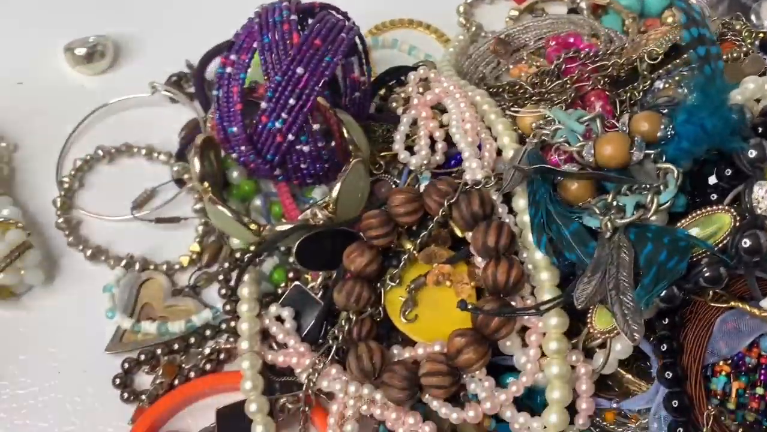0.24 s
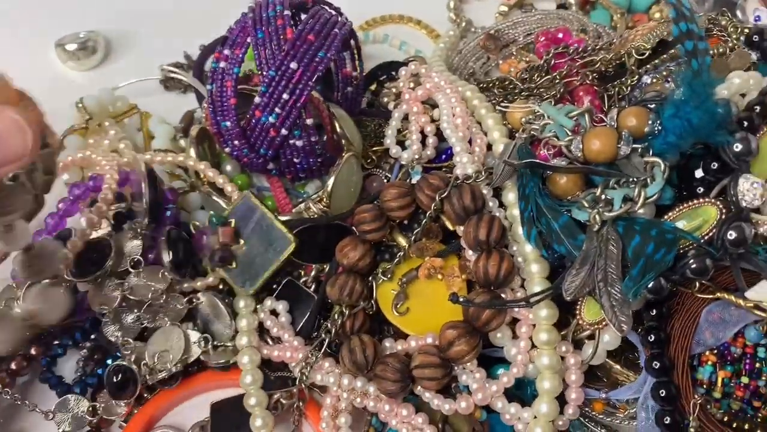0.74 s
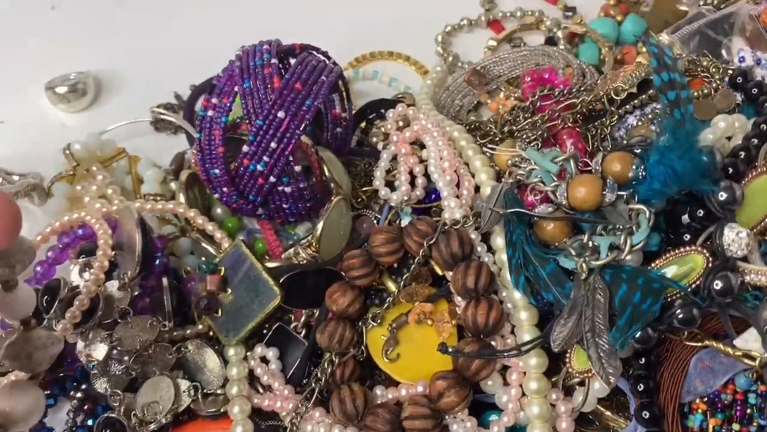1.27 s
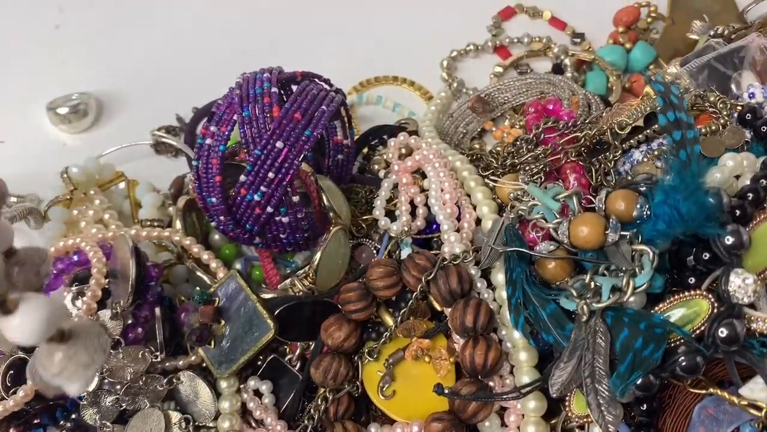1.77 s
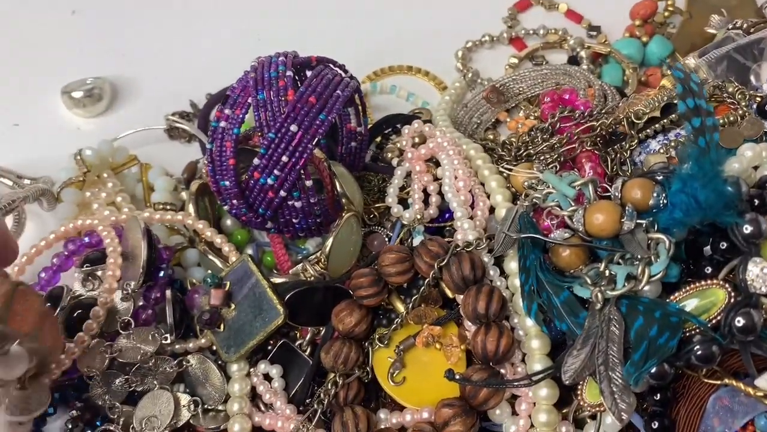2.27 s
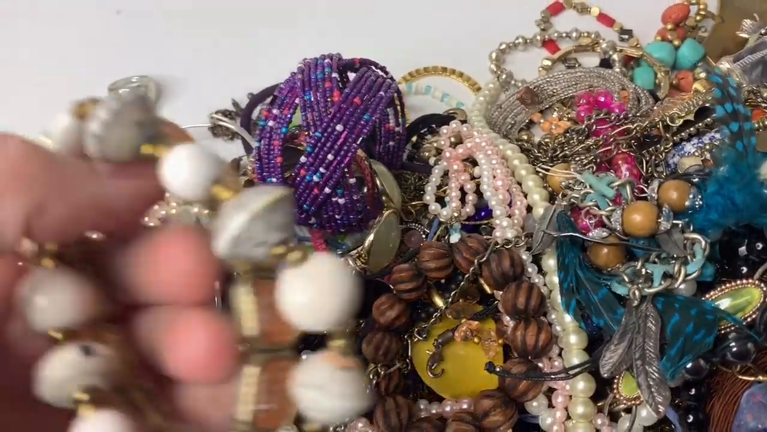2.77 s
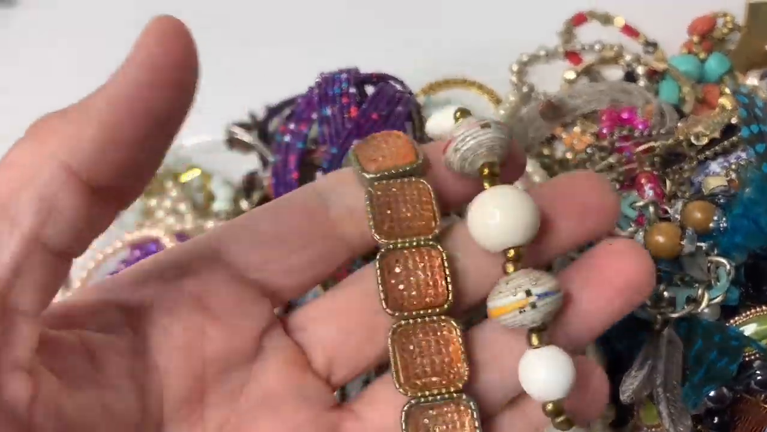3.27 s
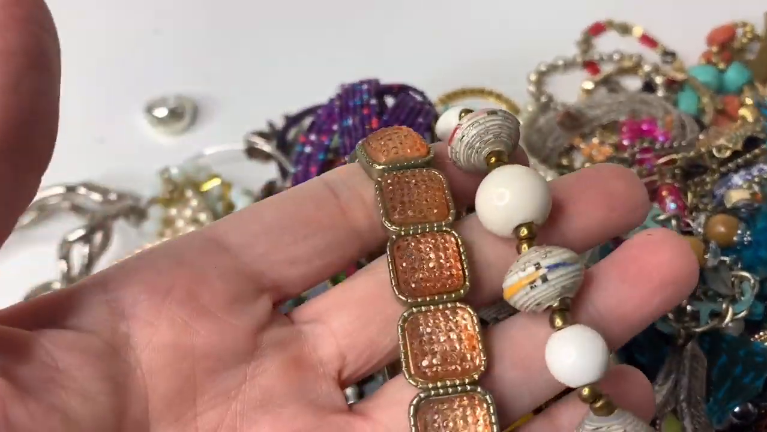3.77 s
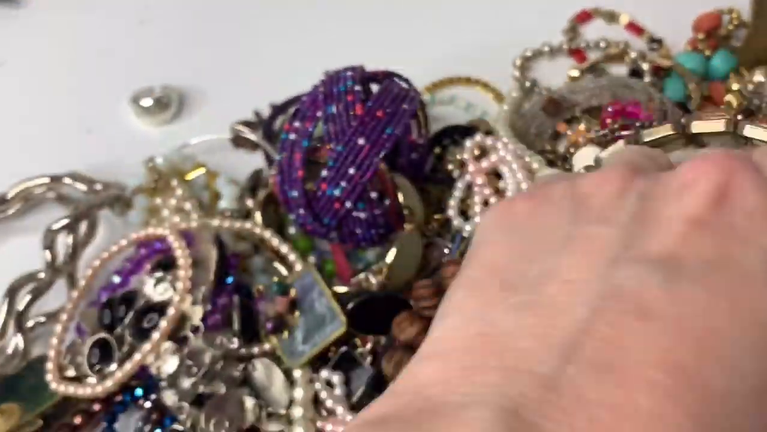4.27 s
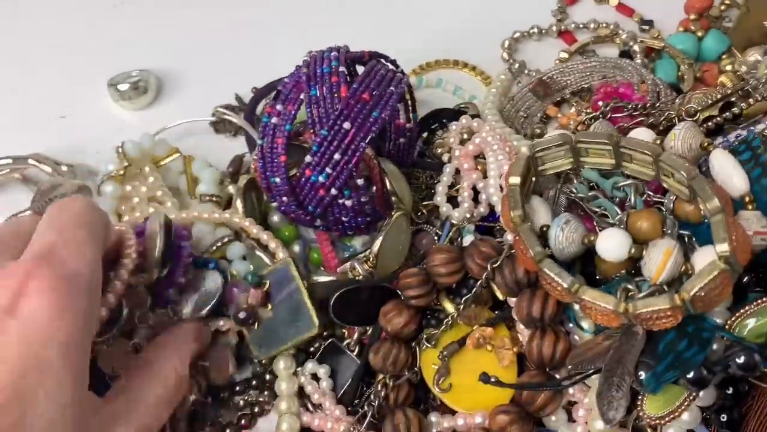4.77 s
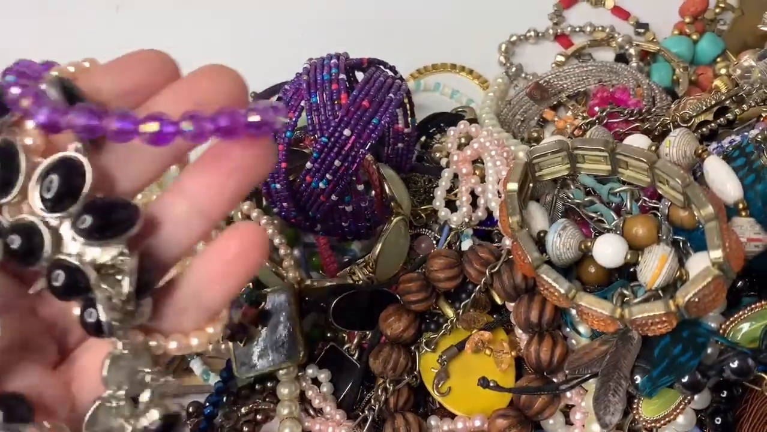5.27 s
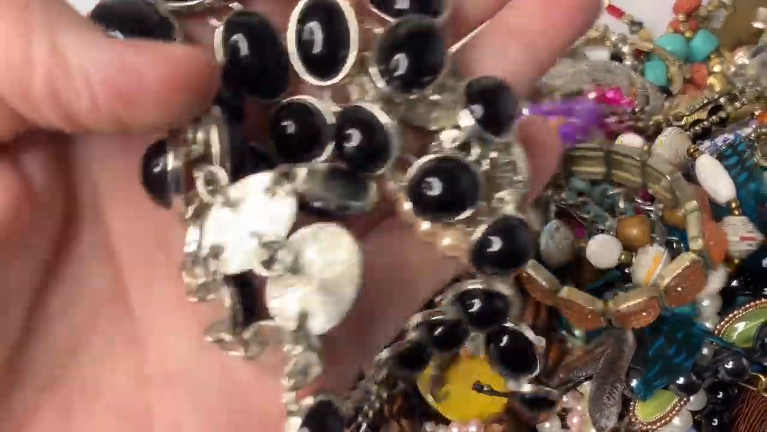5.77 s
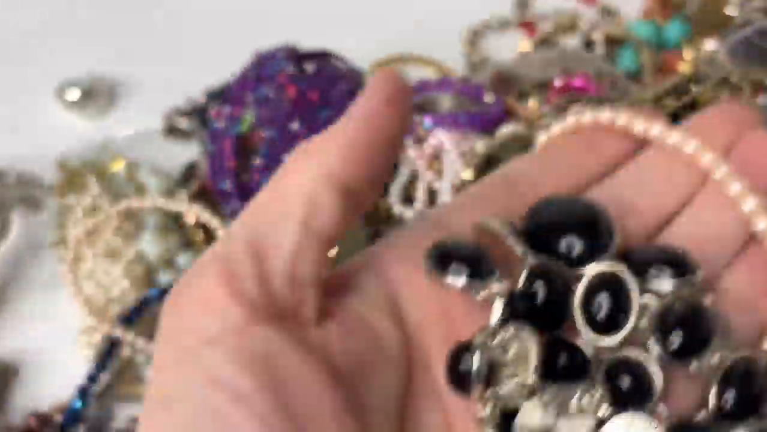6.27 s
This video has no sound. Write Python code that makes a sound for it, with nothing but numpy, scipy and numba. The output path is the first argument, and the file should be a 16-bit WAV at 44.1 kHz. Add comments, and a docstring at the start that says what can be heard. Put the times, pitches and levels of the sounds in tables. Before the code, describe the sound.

In a small room a fan runs throughout, a soft low airy hum. From about 0.1 s a bundle of jewellery drags over a table: dull knocks, low rumble and dense bead clatter, ending in a sharp bright crash of chains near 0.55-0.6 s. Loose ticks dwindle through 1 s, with only isolated tiny clicks until 2.1 s. Light bead clicks and faint rustles follow to 2.8 s, with one clear clack at 3.0 s. Almost only the fan remains until 4.15 s, when a bracelet is laid down with brief clinks. At 4.7-5.15 s a necklace is grabbed and pulled free: busy fizzing rattle, bead clacks, table knocks, high disc jingles. Smaller ticks and a dull landing at 5.57 s continue to 5.95 s. A crisp, very bright metallic clash strikes around 6.2 s, the fan briefly dips, and fine chain rattle rises again at 6.5 s. Close, dry stereo phone pickup.

```python
"""Rummaging through costume jewellery

Hands stir a heap of costume jewellery on a table, close to a phone in a small room with a humming fan.
A bundle is dragged over the table top, then bracelets and necklaces are picked up, turned over and dropped.
Contacts ring beads and links as short damped sines; metal discs ring longer and the table knocks underneath.
The heap and the walls scatter these sounds; filtered noise and wavering sine lines make the fan."""
import sys
import numpy as np
from scipy import signal
from scipy.fft import rfft, irfft, next_fast_len
from scipy.io import wavfile
from scipy.ndimage import uniform_filter1d
from numba import njit

SR = 44100
rng = np.random.default_rng(int(sys.argv[2]) if len(sys.argv) > 2 else 0)


def pcm_store(signal):
    """Save signal as 16-bit PCM."""
    levels = np.round(np.clip(np.atleast_2d(signal), -1, 1) * 32767)
    wavfile.write(sys.argv[1], SR, levels.astype(np.int16).T)


N = 288272  # length in samples
TOP_HZ = 16200  # upper edge of the phone's band

# How the two microphone ports hear a piece: low bands reach the left port first, treble the right one.
# Each row: frequency in Hz, typical lag of the left port in seconds.
PORT_LAG = [(5500, -.00028), (6800, .000183)]


def undb(db):
    """Decibels to gain."""
    return 10 ** (np.asarray(db) / 20)


def unit(x):
    """Scale to rms 1."""
    return x / np.sqrt(np.mean(x ** 2))


def on_log(hz, points):
    """Read (Hz, value) points on a log-frequency axis."""
    point_hz, value = np.transpose(points)
    return np.interp(np.log(hz + 1), np.log(point_hz), value)


def colour(x, points):
    """Filter by a (Hz, dB) spectrum."""
    length = x.shape[-1]
    n = next_fast_len(length + 1000, real=True)
    hz = np.arange(n // 2 + 1) * SR / n
    return irfft(rfft(x, n) * undb(on_log(hz, points)), n)[..., :length]


def walk(rate):
    """Slow chance: random levels, rate of them a second, joined by straight lines."""
    return np.interp(np.arange(N) / SR * rate, np.arange(512), rng.standard_normal(512))


@njit
def ring(s, lag, hz, t60, size, rise_s):
    """Damped sines that swell over rise_s, a row for each contact; the left port hears them lag seconds later."""
    out = np.zeros((2, N))
    for k in range(len(s)):
        for m in range(hz.shape[1]):
            pole = (2j * np.pi * hz[k, m] - np.log(1000) / t60[k, m]) / SR
            step = np.exp(pole)
            for side in range(2):
                start = (s[k] + lag[k, m] * (1 - side)) * SR
                first = int(start) + 1
                last = min(N, first + int((t60[k, m] + rise_s) * SR))
                # the start falls between samples
                z = size[k, m] * np.exp(pole * (first - start))
                for i in range(max(first, 0), last):
                    swell = min((i - start) / (rise_s * SR), 1.)
                    out[side, i] += z.imag * swell * swell * (3 - 2 * swell)
                    z *= step
    return out


def contacts(s, db, top_hz, ring_s, ring_spread, lag_spread, centre_hz=None, octaves=0.91, count=8):
    """Each contact rings its own small piece: chance partials up to about top_hz, with ring times around ring_s."""
    place, turn = rng.random((len(s), 2, count)).transpose(1, 0, 2)
    strength, decay, where = rng.standard_normal((len(s), 3, count)).transpose(1, 0, 2)
    hz = top_hz * (np.arange(count) + .5 + place) / (count + .5)
    t60 = ring_s * np.exp(ring_spread * decay)
    size = undb(1.3 * strength) * (ring_s / t60) ** .5
    if centre_hz is not None:
        size = size * np.exp(-.5 * (np.log2(hz / centre_hz[:, None]) / octaves) ** 2)
    size = size * (undb(db) / np.linalg.norm(size, axis=1))[:, None]
    size = size * np.exp(2j * np.pi * turn)
    # pieces lie in different directions, so their lags between the ports differ
    lag = on_log(hz, PORT_LAG) * (1 + lag_spread * where[:, :1])
    return ring(s, lag, hz, t60, size, rise_s=0.00013)


def shower(gain, rate, spread_db, top_hz, ring_s, lag_spread, points, count=7000):
    """A random run of contacts, many faint and a few strong; harder movement makes them denser and louder."""
    # full rate (per s) from this level up; gentler moves thin the contacts out by the power
    busy_db, crowding = -29, .6
    chance = rng.random((count, 2))
    busy = np.minimum(gain / undb(busy_db), 1) ** crowding
    # exponential gaps on a clock that runs with the busyness
    at = np.searchsorted(np.cumsum(busy) * rate / SR, np.cumsum(-np.log(1 - chance[:, 0])))
    at = at[at < N]
    excess_db = spread_db * np.minimum(-np.log(1 - chance[:len(at), 1]), 3.5)
    db = excess_db + 10 * np.log10(gain[at] ** 2 / busy[at])
    # the wide spread lets a few pieces ring much longer than the rest
    run = colour(contacts(at / SR, db, top_hz, ring_s, 1., lag_spread), points)
    # the whole run takes the rms of the gain
    return unit(run) * np.sqrt(np.mean(gain ** 2))


def strike(s, db, modes, detune, scatter_db, weight=1):
    """Blows on a body with nearly fixed modes; each blow meets it at another spot and excites them differently."""
    hz, mode_db, t60 = np.transpose(modes)
    shift, spot = rng.standard_normal((len(s), 2, len(hz))).transpose(1, 0, 2)
    size = np.sign(spot) * undb(mode_db + scatter_db * np.abs(spot)) * weight
    size = size * (undb(db) / np.linalg.norm(size, axis=1))[:, None]
    lag = np.tile(on_log(hz, PORT_LAG), (len(s), 1))
    return ring(s, lag, hz * (1 + detune * shift), np.tile(t60, (len(s), 1)), size + 0j, rise_s=0.002)


def strokes(start, length, db, settle_s):
    """Gain over time of a set of strokes: each rises, holds with a slight sag and then fades as the pieces settle."""
    attack_s, sag_db_per_s = 0.01402, 5.5
    t = np.arange(0, N, 32) / SR
    age = t - start[:, None]
    sag_db = sag_db_per_s * np.clip(age, 0, None)
    settle_db = 60 * np.clip(age - length[:, None], 0, None) / settle_s[:, None]
    gain = np.clip(age / attack_s, 0, 1) * undb(db[:, None] - (sag_db + settle_db))
    return np.interp(np.arange(N) / SR, t, np.linalg.norm(gain, axis=0))


def stirring():
    """How hard the hand stirs the fine chains and the larger beads."""
    # Moves of the hand: a bundle dragged and let fall, fingers feeling among the beads, a bracelet laid
    # down, a necklace grabbed, pulled free, turned over on the palm and lowered on to the heap.
    # Each row: start in seconds, length in seconds, fine chains in relative dB, larger beads in relative dB,
    # time to settle by 60 dB in seconds (a negative time grows instead, as at the very end).
    moves = [(0.103, 0.04, -37, -34, 0.92), (0.18, .13, -32.5, -29.5, 0.42), (0.31, .18, -30, -27.5, 0.56),
             (0.552, .066, -24.5, -30.5, 0.0939), (0.63, .02, -41, -48, 0.72),
             (0.984, 0.0237, -38.5, -50, 0.15), (1.34, .09, -80, -68, 0.07),
             (2.113, 0.0191, -60.5, -60, 0.33), (2.183, 0.04, -51, -42, 0.22),
             (2.253, 0.0289, -52, -47, 0.21), (2.36, .02, -78, -64, .5), (2.529, 0.09, -55, -52, 0.3),
             (2.652, 0.045, -54, -50, 0.27), (2.781, 0.0404, -63.5, -58, 0.9), (2.99, .015, -58, -51, 0.2),
             (4.155, 0.0405, -43, -39, 0.68), (4.239, 0.0497, -42, -45, 0.5),
             (4.39, 0.0917, -70, -60, 0.69), (4.655, 0.0399, -42, -50, 0.07),
             (4.705, 0.06, -29, -30.5, 0.09), (4.802, .1, -33, -38, 0.26), (4.91, 0.085, -32.5, -45, 0.07),
             (5.04, 0.054, -38.5, -42.5, 0.14), (5.135, 0.035, -36, -45, 0.38),
             (5.196, 0.0968, -50, -54.5, 0.3), (5.346, 0.02825, -55, -54, 0.13),
             (5.415, 0.125, -48, -51.5, 0.2), (5.563, 0.04, -39, -39.5, 0.26),
             (5.668, 0.04, -47.5, -54, 0.35), (5.759, .025, -39, -50, 0.5),
             (5.846, 0.0952, -39, -51.5, 0.62), (6.083, 0.0252, -49, -61.5, 0.73),
             (6.174, 0.028, -23.5, -42, 0.09), (6.409, 0.069, -53, -56, 0.7),
             (6.495, 0.04, -30.5, -44.5, -2)]
    start, length, chain_db, bead_db, settle_s = np.transpose(moves)
    return strokes(start, length, chain_db, settle_s), strokes(start, length, bead_db, settle_s)


def rattle(chain_gain, bead_gain):
    """Chain links sizzle and larger beads clatter as the heap is stirred; strands snag and slip in quick spurts."""
    # Spectrum of the fine chains. Each row: frequency in Hz, relative level in dB.
    chain_colour = [(1000, -35), (2500, -28.5), (4000, -11.5), (6000, -11.5), (7500, 2), (9400, -.5),
                    (11500, 1), (13200, -5.5), (14300, 0), (15200, 4), (16500, -27.5)]
    # Spectrum of the larger beads. Each row: frequency in Hz, relative level in dB.
    bead_colour = [(500, -24), (1500, -4), (2100, -3), (2700, -2.5), (3400, -1), (4400, 0.5), (5200, -4),
                   (6500, -4.5), (10000, -15), (16000, -24.5)]
    # How unevenly the strands slip, less in the steady drag and more once they are picked up.
    # Each row: time in seconds, typical swing of the level in dB.
    snag = [(.55, 1), (.7, 2.)]
    chains = shower(chain_gain, rate=1800, spread_db=2.2, top_hz=16750.0, ring_s=.0028,
                    lag_spread=0.016, points=chain_colour)
    beads = shower(bead_gain, rate=1400, spread_db=2.3, top_hz=8882.0, ring_s=0.005,
                   lag_spread=0.5, points=bead_colour)
    swing_db = np.interp(np.arange(N) / SR, *np.transpose(snag))
    spurts = undb(swing_db * walk(70))
    # the larger beads are 3 dB louder at the right port
    beads = beads * undb(np.array([[-1], [1]]) * 3 / 2)
    return spurts * (chains + undb(-4.0) * beads)


def strays(stir, per_s, over_db, hz):
    """Chance contacts that stand out of the rattle and follow the stirring: rows of (s, relative dB, Hz)."""
    spread_db, octaves = 1.5, .9  # scatter either way of level and pitch
    slot, strength, tone = rng.random((int(per_s * N / SR), 3)).T
    s = (np.arange(len(slot)) + slot) / per_s
    stir_db = 20 * np.log10(np.interp(s * SR, np.arange(N), stir) + 1e-9)
    db = stir_db + over_db + spread_db * (2 * strength - 1)
    return np.transpose([s, db, hz * 2 ** (octaves * (2 * tone - 1))])


def clicks(rows):
    """Beads and links click: a graze, a sharp tick, then neighbours rebound and ring on a little."""
    # Spectrum of the clicks. Each row: frequency in Hz, gain in dB.
    click_colour = [(800, -9), (2000, 2), (2800, 1.5), (4500, -0.5), (16000, 0.5)]
    s, db, hz = rows.T.copy()
    brush, first, second = rng.random((len(s), 3)).T
    graze = contacts(s - 0.006 * brush, db - 16.5, TOP_HZ, ring_s=0.0027, ring_spread=0.35,
                     lag_spread=0.065, centre_hz=hz)
    tick = contacts(s, db + 2.5, TOP_HZ, ring_s=.0021, ring_spread=.35,
                    lag_spread=.04, centre_hz=hz, octaves=.55, count=16)
    rebound = contacts(s + 0.000615 + 0.0025 * first, db - 7.0, TOP_HZ, ring_s=0.0019, ring_spread=.6,
                       lag_spread=.08, centre_hz=hz)
    tinkle = contacts(s + .002 + .01 * second, db - 21, 12500, ring_s=.017, ring_spread=.6,
                      lag_spread=.08, centre_hz=hz)
    return colour(graze + tick + rebound + tinkle, click_colour)


def clacks(rows):
    """Hard beads knock together and ring briefly; no two have quite the same shape."""
    # The ring of a bead. Each row: nominal multiple of its pitch, level in dB, share of its ring time.
    bead_modes = [(1, -0.5, 0.86), (1.37, -11, .6), (2.36, -8, .5)]
    lag_s = -0.00015  # typical lag of the left port
    s, db, hz, t60 = rows.T.copy()
    ratio, mode_db, share = np.transpose(bead_modes)
    shape, spot, where = rng.standard_normal((len(s), 3, len(ratio))).transpose(1, 0, 2)
    partials = np.minimum(hz[:, None] * ratio ** (1 + 0.052 * shape), TOP_HZ)
    size = undb(db[:, None] + mode_db) * np.sign(spot)
    return ring(s, lag_s * (1 + .5 * where), partials, t60[:, None] * share, size + 0j, rise_s=.0003)


def discs():
    """Small thin metal discs strike each other and jingle with high, close partials."""
    # Strikes. Each row: time in seconds, level in dB.
    jingles = [(4.712, -45), (4.805, -22), (4.914, -17), (4.932, -17), (6.195, -10.5), (6.206, -21)]
    # Modes of a disc. Each row: nominal frequency in Hz, relative level in dB, time to fall 60 dB in seconds.
    disc_modes = [(10800, -7, .035), (11330, -8, .035), (14700, -6, .04), (15040, 0, .05), (15350, -1, .05),
                  (15500, -2, .045)]
    s, db = np.array(jingles).T.copy()
    return strike(s, db, disc_modes, detune=0.0032, scatter_db=2.5)


def table():
    """The table top chatters under sliding beads, rumbles under the bundle and knocks when a piece lands."""
    # Heavy beads sliding and rolling on the table top.
    # Each row: start in seconds, length in seconds, relative level in dB, time to settle by 60 dB in seconds.
    slides = [(0.11, 0.01944, -36, 0.26), (0.168, 0.0203, -28, 0.25), (0.21, .31, -35.5, 0.5),
              (0.32, .15, -39, 0.3), (0.553, 0.017, -27, 0.12), (4.702, 0.06, -33, 0.37),
              (4.81, 0.085, -39.5, .1), (4.925, 0.025, -42, 0.06), (5.044, 0.0259, -47, 0.17),
              (5.354, 0.02514, -47.5, 1.14), (5.565, 0.038, -38, 0.2), (5.863, 0.01973, -43.5, 0.27),
              (5.918, 0.019, -43, 0.24)]
    # The table rumbling under the dragged bundle.
    # Each row: start in seconds, length in seconds, relative level in dB, time to settle by 60 dB in seconds.
    rumbles = [(0.111, .15, -30, .5), (0.309, .15, -26, 0.63)]
    # Pieces landing. Each row: time in seconds, relative level in dB, centre of the colour in Hz.
    landings = [(0.124, -14.5, 248), (0.18, -11.5, 248), (0.457, -14.5, 253), (0.561, -18, 500),
                (0.594, -22.5, 800), (4.754, -18.5, 226), (4.936, -19, 340), (5.575, -25, 700),
                (5.93, -30, 600.2)]
    # Modes of the top. Each row: nominal frequency in Hz, relative level in dB, time to fall 60 dB in seconds.
    top_modes = [(91.65, -4, 0.048), (248, 3, .06), (342.4, -4.5, 0.18), (415.6, -2, 0.079),
                 (610, -11.5, 0.031), (772, 4, 0.05), (1244, -4.5, 0.023), (1506, -1.5, .02),
                 (1826, 8, 0.017)]
    # Spectrum of the sliding. Each row: frequency in Hz, relative level in dB.
    slide_colour = [(150, -14), (350, 4.5), (500, 0), (780, 3), (1050, -3), (1450, -.5), (2000, -9.5),
                    (2900, -10.5), (6000, -18.5)]
    # Spectrum of the rumble. Each row: frequency in Hz, relative level in dB.
    rumble_colour = [(40, -27), (90, -10), (150, -7), (250, 1), (380, -2), (520, -7.5), (1000, -36)]
    slide = shower(strokes(*np.transpose(slides)), rate=800, spread_db=3.0, top_hz=6096.0, ring_s=0.011,
                   lag_spread=0.51, points=slide_colour)
    rumble = shower(strokes(*np.transpose(rumbles)), rate=450, spread_db=1.5, top_hz=716.0, ring_s=0.029,
                    lag_spread=0.87, points=rumble_colour)
    s, db, hz = np.array(landings).T.copy()
    # a harder, lighter piece wakes the higher modes
    mode_hz = np.array(top_modes)[:, 0]
    weight = np.exp(-.5 * (np.log2(mode_hz / hz[:, None]) / 2.0) ** 2)
    knocks = strike(s, db - 2.5, top_modes, detune=.04, scatter_db=2, weight=weight)
    # louder at the left port
    return (undb(-0.14) * slide + undb(-4.0) * rumble + knocks) * undb(np.array([[1], [-1]]) * 1.6)


def room(x, count=8):
    """The heap scatters the sound at once, by paths that change as the pieces shift; the walls add a faint tail."""
    # Spectrum of the scattered sound. Each row: frequency in Hz, gain in dB.
    scatter_colour = [(200, -8), (1000, -2), (2500, 7.5), (5500, 5.5), (8500, -4.5), (11000, 2.5),
                      (16000, -3)]
    # scatter in the heap: time to die away by 60 dB, how long one set of paths lasts, level
    scatter_s, shift_s, scatter_db = .016, .015, -10
    t = np.arange(SR // 2) / SR
    far = rng.standard_normal((2, len(t))) * undb(-60 * t / 0.16) * (1 - np.exp(-t / 0.018))
    echoes = undb(-25) * signal.fftconvolve(x, unit(far) / np.sqrt(len(t)), axes=1)[:, :N]
    t = t[:int(scatter_s * SR)]
    hold = int(shift_s * SR)
    near = rng.standard_normal((count, 2, len(t))) * undb(-60 * t / scatter_s) * (1 - np.exp(-t / .001))
    path = np.repeat(rng.integers(0, count, N // hold + 1), hold)[:N]
    for k in range(count):
        # each set of paths fades in and out smoothly
        share = uniform_filter1d(1. * (path == k), hold // 2)
        scattered = signal.oaconvolve(x * share, unit(near[k]) / np.sqrt(len(t)), axes=1)[:, :N]
        echoes = echoes + undb(scatter_db) * scattered
    return x + colour(echoes, scatter_colour)


def hum():
    """Sine lines of the fan; each wavers a little and reaches the two ports out of step."""
    shaft_hz, motor_hz = 45.68, 59.2
    # Lines of the shaft. Each row: multiple of the shaft speed, typical level in dB rms.
    shaft = [(2, -60), (3, -63), (4, -50), (5, -57), (6, -56), (7, -63), (8, -57.5), (11, -63.5),
             (12, -62.5), (14, -68), (15, -69), (19, -75)]
    # Lines of the motor. Each row: multiple of the motor speed, typical level in dB rms.
    motor = [(1, -59), (2, -65), (4, -57), (5, -52), (7, -53), (8, -69), (10, -62), (12, -71), (13, -68),
             (14, -72), (15, -76)]
    # Faint whines. Each row: frequency in Hz, typical level in dB rms.
    whine = [(1370, -78), (1567, -73), (1640, -75), (1836, -79), (2540, -87), (3505, -80), (3677, -86.5)]
    t = np.arange(N) / SR
    lines = [(k * shaft_hz, db) for k, db in shaft]
    lines += [(k * motor_hz, db) for k, db in motor]
    lines += whine
    out = 0
    for hz, db in lines:
        apart = np.array([[1], [-1]]) * rng.choice([-1, 1]) * min(hz / 1100, .6)  # radians
        level = np.sqrt(2) * undb(db + .8 * walk(4))
        phase = 2 * np.pi * (hz * t + rng.random()) + .3 * walk(3) + apart
        out = out + level * np.sin(phase)
    return out


def fan():
    """Soft low air noise, partly alike at the two ports, with wavering hum lines."""
    # Spectrum of the air noise. Each row: frequency in Hz, relative level in dB.
    air_colour = [(15, -63.5), (25, -41.5), (49, -12.5), (114, -15), (150, -8.5), (200, -10.5), (245, -3),
                  (285, -5.5), (326, -8.5), (416, -11), (451, -14), (520, -17), (690, -16.5), (750, -23.5),
                  (936, -27), (1380, -27), (1480, -34), (1610, -24.5), (1740, -34.5), (2300, -37.5),
                  (2700, -49), (3300, -42), (3900, -49.5), (5200, -58), (7000, -60.5), (8500, -69.5),
                  (11000, -60.5), (13500, -72.5), (16000, -69.5)]
    # Likeness of the noise left and right. Each row: frequency in Hz, correlation.
    air_likeness = [(60, 0.84), (250, 0.77), (500, 0.49), (1000, -.1), (2000, 0), (8000, -0.198)]
    # The background level dips briefly. Each row: time in seconds, gain in dB.
    dip = [(6.21, 0), (6.235, -10.5), (6.32, -7.5), (6.44, 0.5)]
    air_db = -45.3  # typical rms of the part common to both ports
    hz = np.arange(N // 2 + 1) * SR / N
    likeness = np.clip(on_log(hz, air_likeness), -.9, .98)
    mid, side = colour(rng.standard_normal((2, N)), air_colour)
    # more side against mid makes the ports less alike
    side = irfft(rfft(side) * np.sqrt((1 - likeness) / (1 + likeness)), N)
    air = (mid + side * np.array([[1], [-1]])) / np.std(mid)
    air = air * undb(air_db + 0.43 * walk(4.9))
    return (air + hum()) * undb(np.interp(np.arange(N) / SR, *np.transpose(dip)))


def scene():
    """Jewellery and table in the room, over the fan."""
    # Clear clicks of beads and links.
    # Each row: time in seconds, relative strength in dB, centre of the colour in Hz.
    clear_clicks = [(0.1105, -18.5, 9000), (0.1258, -11.5, 4105), (0.16, -17, 11500), (0.179, -11, 4500),
                    (0.183, -3, 4600), (0.2381, -6, 11000), (0.2505, 0.5, 8900), (0.271, -7.5, 8000),
                    (0.411, -16, 3500), (0.439, -15.5, 3200), (0.4605, -10, 4530), (0.479, -10, 9000),
                    (0.5678, 1, 7290), (0.5772, 3, 12000), (0.5841, -1.5, 9534), (0.595, -3, 10500),
                    (0.607, -11, 13000), (0.613, -15, 12000), (0.646, -17, 11000), (0.667, -27, 10000),
                    (0.7163, -20, 13470), (0.7364, -17, 10710), (0.7491, -23, 9500), (0.7693, -20, 11200),
                    (0.802, -29.5, 10400), (0.8384, -20.5, 11500), (0.8974, -33, 7040), (0.907, -38, 5500),
                    (0.9442, -25, 5030), (0.9726, -38, 9000), (0.9977, -22, 4200), (1.0067, -17.5, 10400),
                    (1.017, -17, 9080), (1.2523, -23.5, 12100), (1.3965, -40, 5015), (1.42, -43.5, 8000),
                    (1.6997, -32, 10470), (1.8114, -26.5, 8505), (2.1174, -15, 8500), (2.2191, -13, 8900),
                    (2.2703, -27, 11000), (2.3025, -17, 11900), (2.537, -18.5, 9500), (2.566, -20, 9000),
                    (2.5907, -26, 10000), (2.5986, -20.5, 8350), (2.6606, -23, 9400), (2.681, -29, 6500),
                    (2.692, -28, 6000), (2.725, -35, 4500), (2.7399, -31, 6700), (2.7535, -40, 8000),
                    (2.8014, -34, 4106), (2.8223, -27, 8000), (2.857, -38, 7500), (2.8887, -33.5, 4270),
                    (2.918, -33.5, 4540), (2.9512, -34.5, 5120), (2.9984, -26.5, 2745),
                    (3.007, -6.5, 10500), (3.0085, -17, 3500), (3.0195, -25, 5490), (3.06, -33, 6500),
                    (3.0733, -31, 5000), (3.116, -39, 5000), (4.162, -23, 5000), (4.1735, -19.5, 6500),
                    (4.184, -20, 4500), (4.2046, -10.5, 10800), (4.2671, -14, 11800), (4.302, -9.5, 11110),
                    (4.401, -37, 6754), (4.4273, -39.5, 10000), (4.463, -26.5, 12820),
                    (4.5533, -25.5, 9200), (4.6633, -28, 12000), (4.6883, -25, 10000),
                    (4.7068, -20.5, 3000), (4.7118, -11, 15000), (4.7168, -20, 3800), (4.7255, -19, 4570),
                    (4.7335, -13, 5500), (4.7457, -19, 3900), (4.7575, -17, 9000), (4.7635, -9, 10500),
                    (4.8048, -2, 11500), (4.8165, -16, 9000), (4.8704, -25, 12000), (4.8834, -13.5, 15000),
                    (4.9025, -16, 9000), (4.9145, -7, 14000), (4.9235, -9.5, 13100), (4.9318, -2.5, 13200),
                    (4.933, -11, 4000), (4.9455, -7, 6500), (4.9595, -7, 13000), (4.9745, -11, 12000),
                    (4.9842, -13, 10800), (5.0135, -17, 11000), (5.0246, -14, 10400), (5.0455, -15, 5500),
                    (5.068, -9, 10200), (5.0391, -10, 14970), (5.0889, -9, 12000), (5.0986, -9.5, 8000),
                    (5.1224, -23, 11000), (5.1423, -3, 11200), (5.2002, -25, 11000), (5.2053, -20, 8500),
                    (5.2153, -19.5, 9400), (5.2406, -24, 9900), (5.2539, -23.5, 8950), (5.271, -11, 9200),
                    (5.2853, -23, 8000), (5.2927, -16.5, 9700), (5.3074, -17, 12000),
                    (5.3285, -13.5, 11100), (5.3544, -29, 12000), (5.3854, -27, 10900),
                    (5.4157, -17, 13000), (5.4317, -24.5, 8000), (5.502, -24, 10600), (5.5376, -29, 11000),
                    (5.569, -14, 10900), (5.592, -18.5, 4300), (5.6321, -18.5, 7500), (5.6653, -16, 10500),
                    (5.6706, -17.5, 11000), (5.7138, -6, 10300), (5.757, -5, 10500), (5.776, -12.5, 11000),
                    (5.7994, -20.5, 10900), (5.8283, -26, 10800), (5.8348, -21, 10500),
                    (5.8607, -13, 11500), (5.8855, -16.5, 11000), (5.8902, -16, 11000),
                    (5.9186, -25, 11400), (5.9316, -8.5, 10400), (5.9571, -17.5, 12000),
                    (6.0238, -24, 11100), (6.0347, -27.5, 10500), (6.0904, -19, 11100),
                    (6.13, -29.5, 12000), (6.157, -2.5, 13000), (6.1841, 0, 12000), (6.1853, -9, 6000),
                    (6.1902, -1, 12100), (6.2075, -5, 14200), (6.2258, -23, 12000), (6.2466, -17.5, 13700),
                    (6.2783, -33, 11000), (6.2875, -27.5, 12200), (6.4182, -30, 6350),
                    (6.4546, -15.5, 12600), (6.4805, -9, 14200), (6.4925, -18, 12000), (6.5035, -18, 13000),
                    (6.5157, -9, 14010)]
    # Larger beads clacking together, each with its own note.
    # Each row: time in seconds, relative level in dB, pitch in Hz, nominal ring time (60 dB) in seconds.
    clear_clacks = [(.112, -38.5, 2770, .008), (.125, -20.5, 2377, .012), (.182, -20, 1450, 0.007786),
                    (.46, -21, 1000, 0.007), (.563, -16, 2390, 0.01029), (.596, -23, 1840, 0.01013),
                    (.689, -26, 1770, 0.03), (.706, -36, 3000, .014), (.897, -45, 5289, .01),
                    (.944, -34.5, 2780, .012), (.998, -31, 2800, 0.005), (2.1174, -39, 5300, .009),
                    (2.219, -23, 4500, 0.006), (2.537, -36, 3000, 0.0114), (2.599, -36, 4400, 0.014),
                    (2.74, -39, 4130, 0.01296), (2.889, -43, 2174, 0.01), (2.918, -45, 2400, .012),
                    (3.007, -22, 3030, 0.014), (3.02, -32, 2200, 0.014), (4.162, -27.5, 3273, 0.011),
                    (4.173, -36, 3380, 0.013), (4.183, -36, 3370, 0.011), (4.716, -25, 2149, 0.011),
                    (4.745, -34, 2874, 0.01037), (4.758, -30, 2207, 0.01106), (4.817, -29, 4100, .014),
                    (4.848, -27, 3500, .012), (4.932, -18, 1110, 0.009), (4.946, -20, 1119, 0.01),
                    (4.9595, -28, 2900, .013), (5.045, -29, 2840, .016), (5.068, -28, 1932, .016),
                    (5.142, -28, 3570, 0.014), (5.215, -38, 3700, .014), (5.271, -36, 3400, .012),
                    (5.575, -22, 760, 0.008), (5.583, -28, 1150, 0.006), (5.592, -26, 1250, 0.006),
                    (5.601, -31, 900, 0.007), (5.632, -35, 4300, .012), (5.665, -37, 3350, .012),
                    (5.918, -38.5, 1539, 0.013), (5.931, -26, 1540, 0.009)]
    chain_gain, bead_gain = stirring()
    stray_clicks = strays(np.hypot(chain_gain, bead_gain), per_s=25, over_db=3.5, hz=8000)
    ticks = clicks(np.vstack([clear_clicks, stray_clicks]))
    loose = strays(bead_gain, per_s=40, over_db=4, hz=3000)
    # stray clacks share one nominal ring time of 13 ms
    stray_clacks = np.column_stack([loose, np.full(len(loose), .013)])
    beads = clacks(np.vstack([clear_clacks, stray_clacks]))
    heap = ticks + beads + rattle(chain_gain, bead_gain) + discs() + table()
    return room(heap) + fan()


def record(dry):
    """The phone rounds the highest peaks and cuts the deepest bass and the top."""
    rounded = .75 * np.tanh(dry / .75)
    thin = signal.sosfilt(signal.butter(4, 42, "high", fs=SR, output="sos"), rounded)
    return signal.sosfilt(signal.ellip(10, .2, 90, TOP_HZ, fs=SR, output="sos"), thin)


dry = scene()
out = record(dry)
pcm_store(out)
```